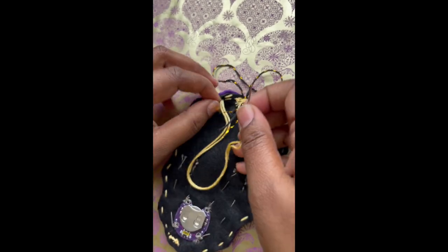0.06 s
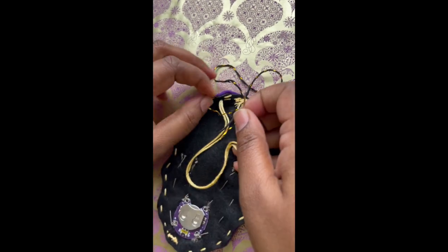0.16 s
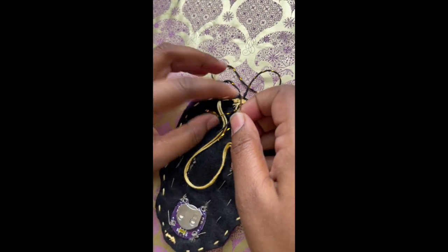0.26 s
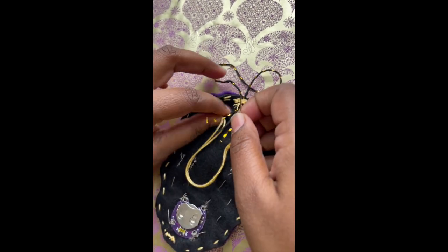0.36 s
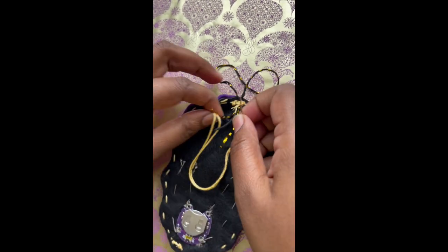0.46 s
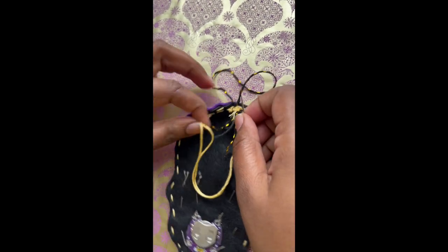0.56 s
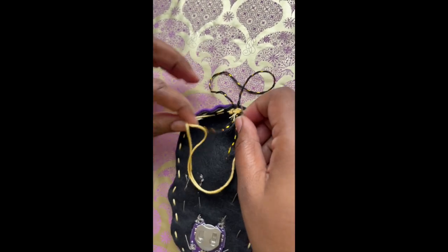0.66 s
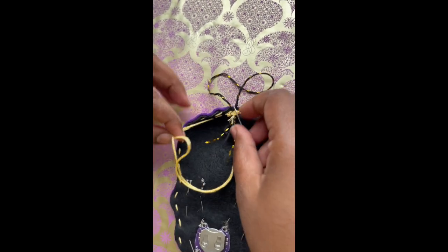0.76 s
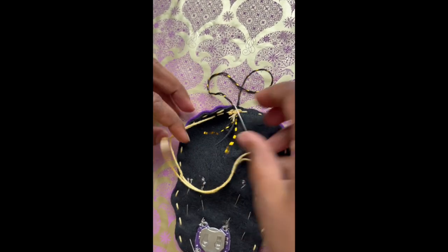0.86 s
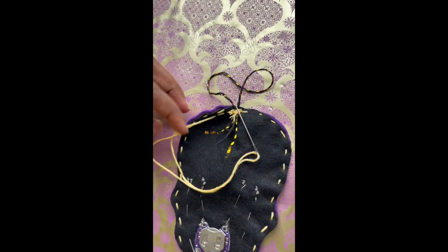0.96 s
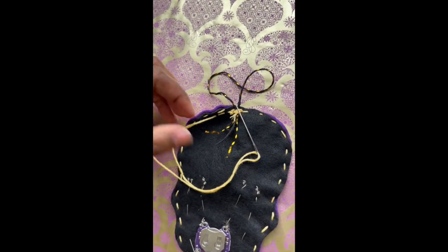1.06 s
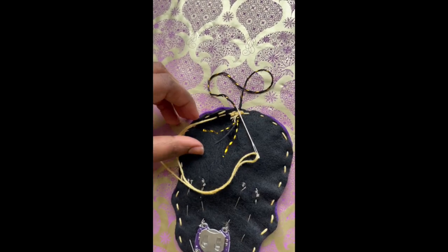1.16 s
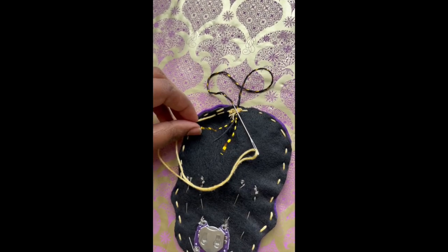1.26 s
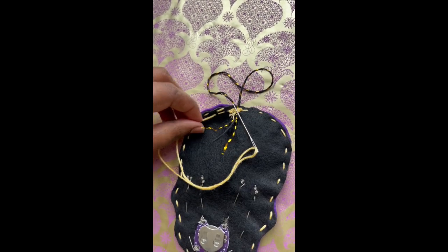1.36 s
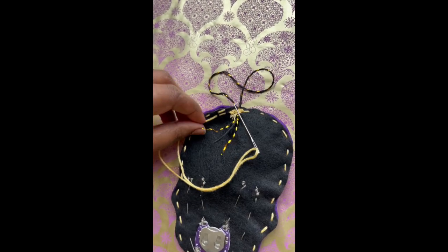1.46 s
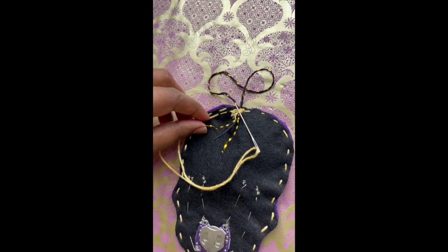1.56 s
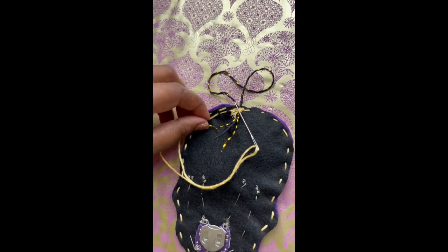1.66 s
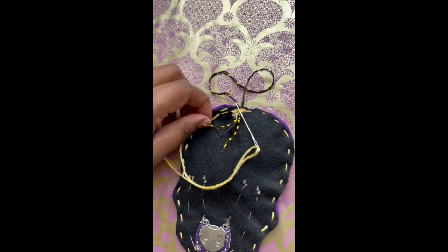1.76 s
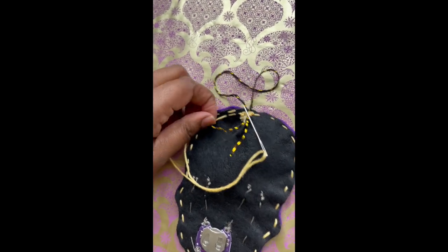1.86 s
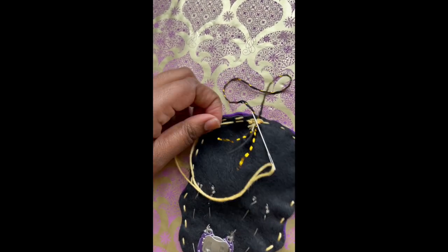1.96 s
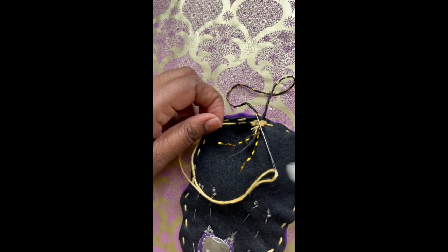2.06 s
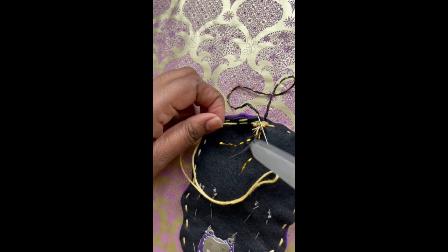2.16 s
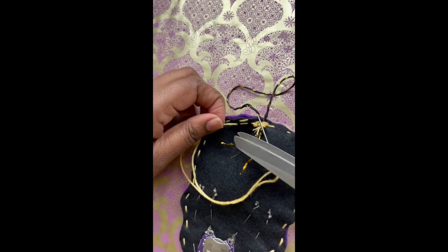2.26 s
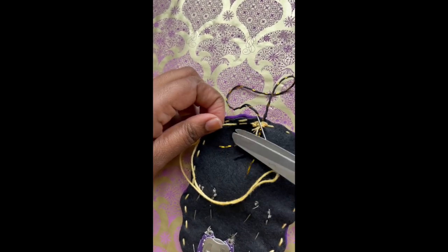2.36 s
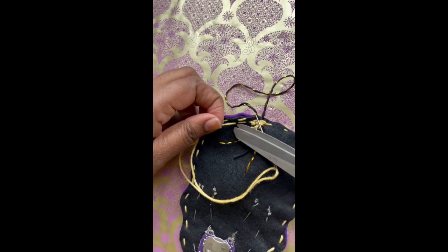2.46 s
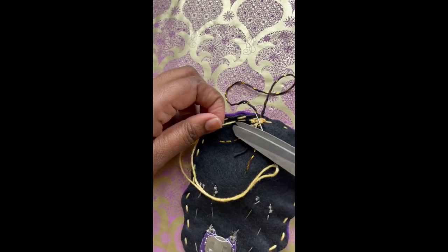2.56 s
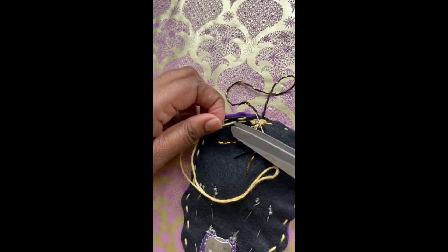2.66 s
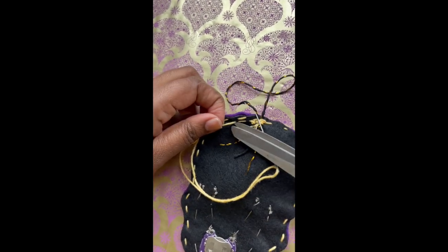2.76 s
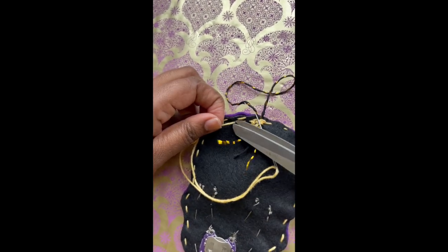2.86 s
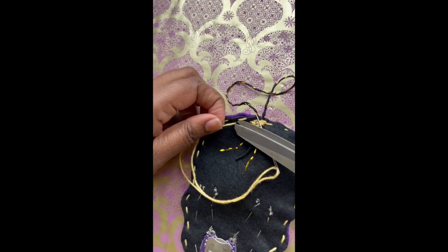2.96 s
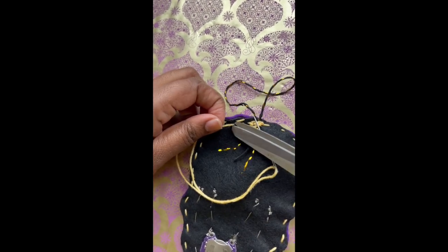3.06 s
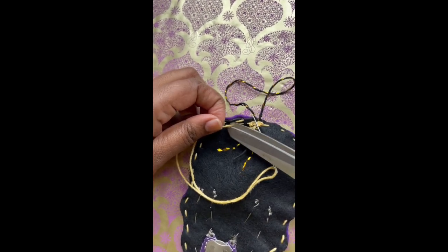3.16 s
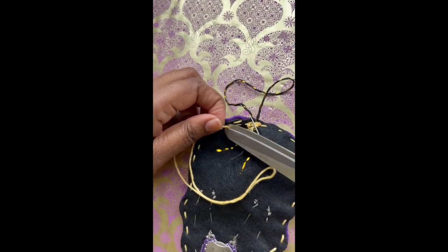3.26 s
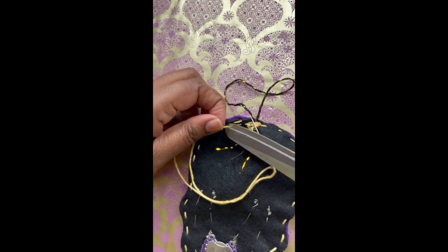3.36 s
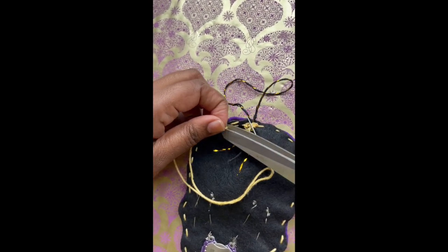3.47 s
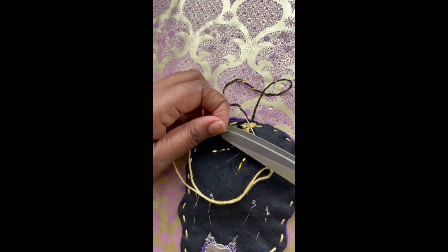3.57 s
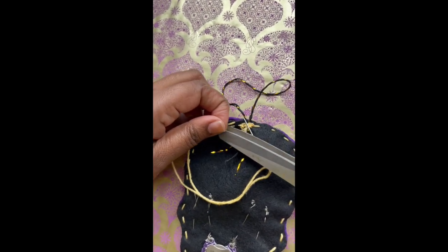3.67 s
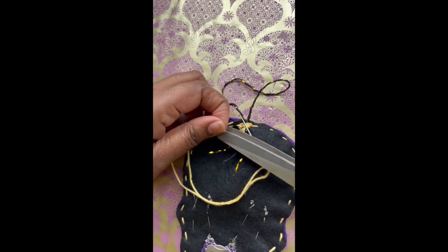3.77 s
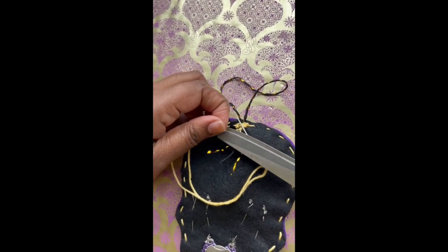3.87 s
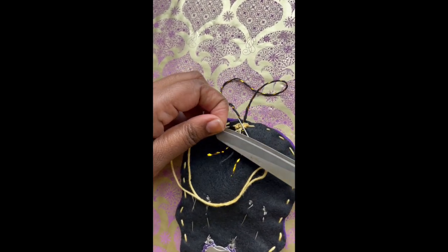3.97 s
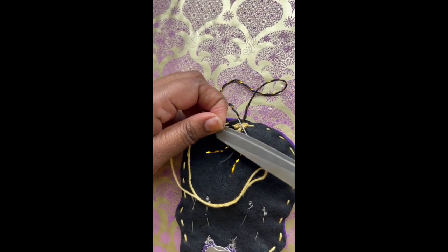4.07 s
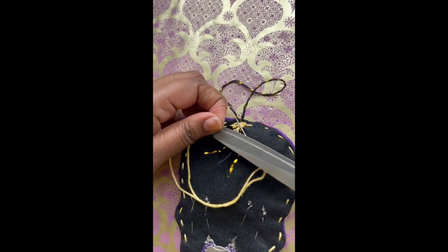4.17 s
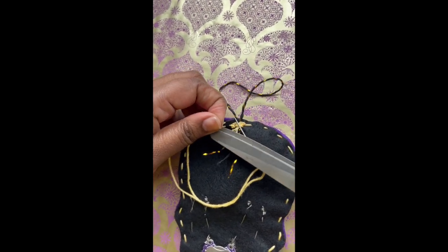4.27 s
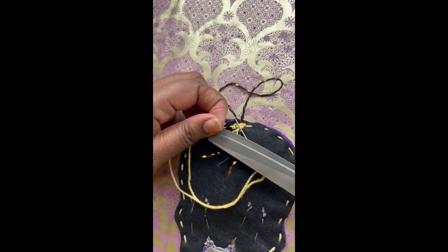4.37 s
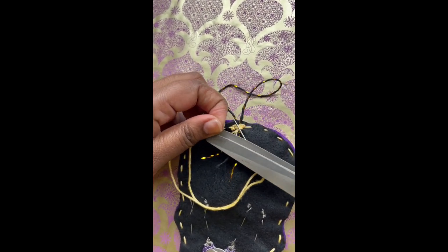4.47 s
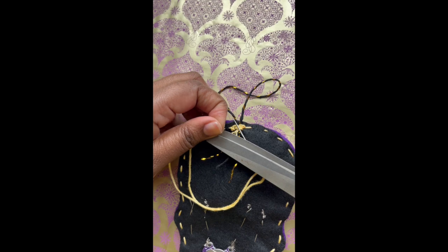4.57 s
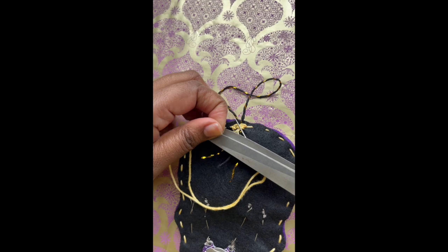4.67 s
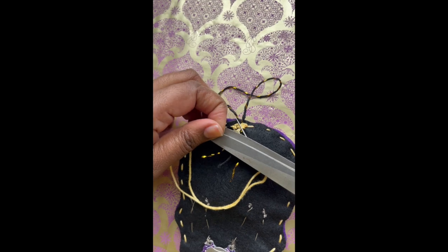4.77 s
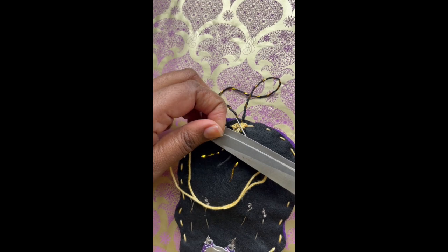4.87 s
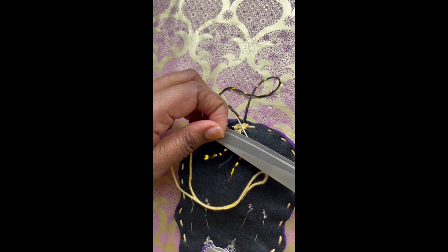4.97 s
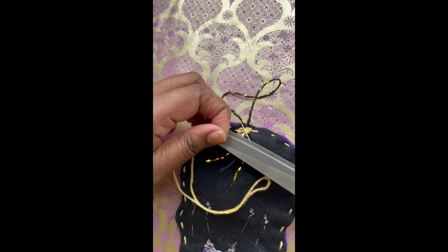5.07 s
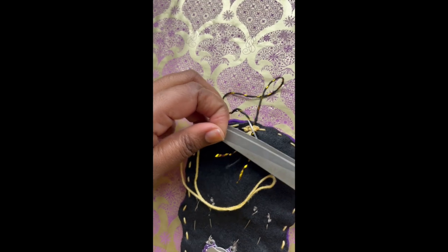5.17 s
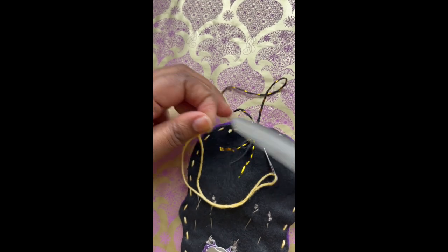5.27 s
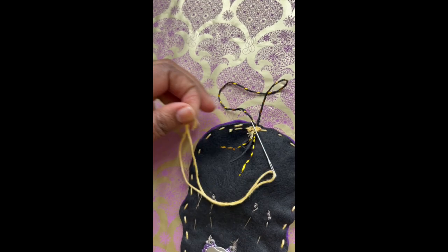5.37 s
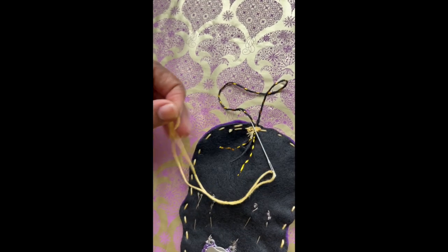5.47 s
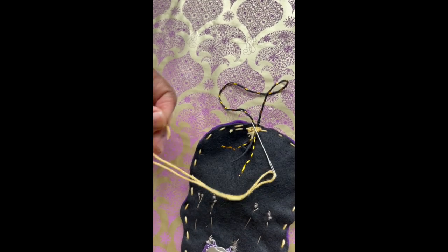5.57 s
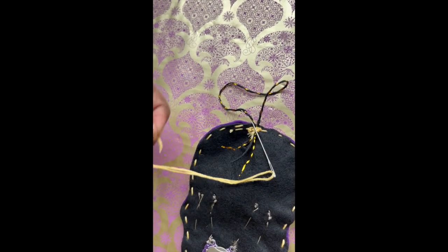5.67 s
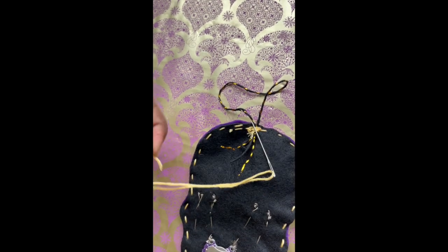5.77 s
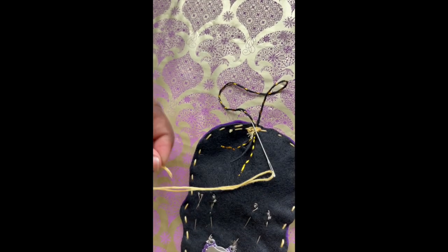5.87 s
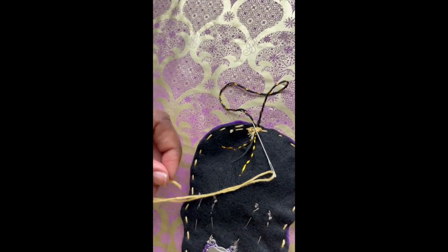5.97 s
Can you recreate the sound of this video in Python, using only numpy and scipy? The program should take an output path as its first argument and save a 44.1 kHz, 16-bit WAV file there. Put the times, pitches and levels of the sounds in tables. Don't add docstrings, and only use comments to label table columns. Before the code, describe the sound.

A close, slightly wide phone pickup in a small room, with soft hiss and a far machine's low, wavering hum. From 0 to 0.8 s fingers rub felt and thread in short dry strokes with small ticks. From 0.8 to 1.7 s handling is busier: sharper snags, a quick thread draw near 1 s, and dull padded table thuds, strongest around 1.26 s. It fades by 2.1 s to faint fingertip shifts and rare ticks. At about 3.75 s blades grind briefly and snap shut at 3.8 s with a bright, short ring. Quiet fidgeting follows; a weaker, duller cut comes around 4.9 s, then slight rustling. At 5.54 s the scissors drop loudly with a metallic crack and low wooden boom, bounce at 5.67 and 5.77 s, rattle briefly and settle, leaving short reverb and hum until about 6 s.

```python
import sys
import numpy as np
from scipy import signal
from scipy.fft import rfft, irfft, next_fast_len
from scipy.io import wavfile
from scipy.ndimage import uniform_filter1d

SR = 44100
rng = np.random.default_rng(int(sys.argv[2]) if len(sys.argv) > 2 else 0)


def decibels_to_gain(level_db):
    exponent = np.asarray(level_db, float) / 20
    return 10 ** exponent


def to_wav(s):
    ch = np.atleast_2d(s).T
    pcm = np.round(np.clip(ch, -1, 1) * 32767)
    wavfile.write(sys.argv[1], SR, pcm.astype(np.int16))


N = 265951


def evened(x):
    return x / np.sqrt(np.mean(x ** 2) + 1e-20)


def shaped(x, points):
    f, db = np.transpose(points)
    size = next_fast_len(x.shape[-1])
    hz = np.fft.rfftfreq(size, 1 / SR)
    above_db = db[-1] - 12 * (f[-1] < 300)
    gain = decibels_to_gain(np.interp(np.log(hz + 1), np.log(f), db, right=above_db))
    return irfft(rfft(x, size) * gain, size)[..., :x.shape[-1]]


def coloured(x, points):
    return evened(shaped(x, points))


def curve(points):
    return np.interp(np.arange(N) / SR, *np.transpose(points))


def add(mix, s, sound):
    part = mix[round(s * SR):][:len(sound)]
    part += sound[:len(part)]


def resonate(x, hz, width):
    turn = np.exp(2j * np.pi * np.cumsum(hz * np.ones(len(x))) / SR)
    r = np.exp(-np.pi * width / SR)
    return 2 * (turn * signal.lfilter([1 - r], [1, -r], x / turn + 1e-18)).real


def strokes(rows, rise, fall, with_last=0.):
    power = np.zeros(N)
    for start, top, end, db, last in rows:
        t = np.arange(0, end - start, 1 / SR)
        swell = (t / (top - start)) ** rise
        release = abs((end - start - t) / (end - top)) ** fall
        shape = np.where(t < top - start, swell, release)
        add(power, start, (decibels_to_gain(db + with_last * last) * shape) ** 2)
    return np.sqrt(power)


def fibres(per_s, spread_db, smooth):
    size = decibels_to_gain(spread_db * np.minimum(rng.exponential(1, N), 3.6))
    slips = size * (rng.random(N) < per_s / SR) * rng.standard_normal(N)
    flutter = evened(uniform_filter1d(rng.standard_normal(N), size=500))
    return (evened(slips) + smooth * rng.standard_normal(N)) * decibels_to_gain(1.85 * flutter)


# time in seconds, hum level in dB.
HUM = [(0, -66.5), (.35, -64), (1.2, -61), (1.47, -58.5), (1.85, -62), (2.1, -64), (2.5, -64.5),
       (3.04, -68.5), (3.48, -66), (3.65, -70), (4.08, -69.5), (4.8, -74), (5.0, -70), (5.13, -81),
       (5.33, -68.5), (5.52, -65), (6.03, -64.5)]
IDLE_DB = -62.5
# frequency in Hz, level in dB.
RUMBLE = [(14, -60.5), (30, -8), (58, 6), (84, -16), (101, 1), (118, -14.5), (152, -6.5), (260, -34)]
DRONE = [(150, -29.5), (210, 2.5), (250, 4), (330, -10.5), (560, -12), (800, -26)]


def machine():
    hum_hz, waver_width_hz = 84.5, 1.5
    hum_db = curve(HUM)
    rumble_db = -70 + 0.36 * (hum_db - IDLE_DB)
    drone_db = -90 + 2.6 * (hum_db - IDLE_DB)
    waver, rumble, drone = rng.standard_normal((3, N))
    hum = 0.32 * evened(resonate(waver, hum_hz, waver_width_hz))
    hum = hum + 1.38 * np.sin(2 * np.pi * hum_hz * np.arange(N) / SR)
    low = decibels_to_gain(rumble_db) * coloured(rumble, RUMBLE) + decibels_to_gain(drone_db) * coloured(drone, DRONE)
    return decibels_to_gain(hum_db + 2.5) * hum + low


# frequency in Hz, level in dB, width in Hz.
MURMUR = [(52.7, -74, 2.7), (102, -76, 2.8), (134, -78, 5.5), (156, -73, 3.8), (215, -85, 3.7),
          (240.2, -85.5, 5.9)]


def table_hum():
    shake = rng.standard_normal((len(MURMUR), N))
    murmur = sum(decibels_to_gain(db) * evened(resonate(v, hz, width)) for (hz, db, width), v in zip(MURMUR, shake))
    return decibels_to_gain(1.2 * (curve(HUM) - IDLE_DB)) * murmur


# frequency in Hz, level in dB.
AIR = [(200, 27.5), (500, 11.5), (1000, 1), (1800, 6), (3000, -2.5), (6000, -4.5), (10000, -43),
       (16000, -55)]
# frequency in Hz, level in dB.
UNLIKE = [(60, -9.5), (250, -8), (700, 7.5), (1200, 6), (1800, -12), (2800, -3), (4800, -1), (6200, -14),
          (10400, -24.5)]


def still_air():
    alike, unlike = decibels_to_gain(-78.5) * coloured(rng.standard_normal((2, N)), AIR)
    return alike + np.array([[1.5], [-1.5]]) * shaped(unlike, UNLIKE)


# frequency in Hz, time to fall 60 dB in seconds.
ROOM = [(100, 0.37), (500, 0.25), (2000, 0.27), (5000, 0.31), (9000, 0.26), (13000, 0.28), (14800, 0.065)]


def room(x):
    taps = np.zeros((2, SR // 2))
    at = np.arange(200, SR // 2 - 20, 20) + rng.integers(0, 20, (2, (SR // 2 - 201) // 20))
    np.put_along_axis(taps, at, rng.choice([-1., 1.], at.shape), 1)
    hz, t, z = signal.stft(taps, SR, nperseg=256)
    t60 = np.interp(hz, *np.transpose(ROOM))[:, None]
    tail = signal.istft(z * decibels_to_gain(-60 * t / t60), SR, nperseg=256)[1]
    tail = tail[0] + np.array([[1], [-1]]) * shaped(tail[1], UNLIKE)
    return signal.fftconvolve(x[None], tail / np.linalg.norm(tail[0]), axes=1)[:, :N]


# frequency in Hz, unlike share in dB.
NEAR_UNLIKE = [(300, -25), (1200, -17.5), (2800, -8), (4800, -12), (6200, -12.5), (10000, -17),
               (13500, -13.5), (15000, -30)]


def scattered(x):
    z = signal.stft(x, nperseg=128)[2]
    phase = 2j * np.pi * rng.random(z.shape[::-1]).T
    turned = signal.istft(z * np.exp(phase), nperseg=128)[1][:N]
    return np.array([[1], [-1]]) * shaped(turned, NEAR_UNLIKE)


# time in seconds, peak in dB, hardness in dB an octave,
# mode favoured by the spot in Hz, ring length factor.
THUDS = [(0.298, -48, 5, 395, 1.4), (0.8, -52.5, 4, 215, 1.8), (0.866, -39, 2, 221, 0.85),
         (0.889, -49.5, 4, 218, 1.4), (1.259, -29, -2, 318, 1.44), (1.47, -36.5, -2.5, 220, 0.94),
         (1.505, -43, -0.5, 243, 0.74), (1.626, -36, 2.5, 235, 0.9), (1.662, -42.5, 5, 272, 0.65),
         (1.705, -48.5, 6.5, 344, 0.48), (1.735, -53.5, -7, 101, 1.1), (2.024, -64, 7, 465, 0.38),
         (3.803, -57.5, 3.5, 231, 0.68), (5.08, -65, 1.5, 228, 2.5), (5.28, -59, -2, 205, 2.2),
         (5.381, -62, 2, 225, 2.5), (5.5396, -20.5, 0.5, 242, 0.73), (5.6663, -23, 2.5, 236, 1.06),
         (5.766, -21, 2, 375, 1.22), (5.813, -38, 3.5, 215, 1)]
SPOTS = [(2, -6, -2, -4), (0, -9, 0, -1), (7, 5, -4, -9), (4, -18, -1, -3), (5, 1, 3.5, -2),
         (-7, 2.5, 1.5, -3), (-2, -3, 1.5, 1), (-1, 6, 5, -8), (-3, -18, -5, 3.5), (-3, -9, 0, -10),
         (-9, -13, -4, -8), (0, -3, -5, 3), (3, 0, -2.5, -2), (-3, 1.5, 0, -1.5), (0.5, -0.5, 1, 0.5),
         (0, 0, 0.5, -1), (1.5, 2.5, -5, 3), (-14, -5, 3, 6), (0, -0.5, 2.5, 1), (-1, 0, -8, -8)]
# frequency in Hz, level in dB, time to fall 60 dB in seconds.
TABLE = [(53, -9.5, 0.37), (70.2, 4.5, 0.3), (97.9, 5, 0.33), (130, 1, 0.31), (164, -8.5, 0.13),
         (180, -14, 0.35), (215, -7.5, 0.18), (242, -9, 0.15), (283, -14, 0.2), (318, -10.5, 0.17),
         (357, -14.5, 0.09), (400, -15, 0.1), (475, -16, 0.095), (589, -14, 0.054)]
BENDING = 0.1094


def thuds():
    out = np.zeros(N)
    hz, mode_db, t60 = np.transpose(TABLE)[:, :, None]
    t = np.maximum(np.arange(SR // 2) / SR - BENDING / np.sqrt(hz), 0)
    sign = -(-1.) ** np.arange(len(TABLE))[:, None]
    nodes = np.pad(SPOTS, [(0, 0), (0, len(TABLE) - len(SPOTS[0]))])[:, :, None]
    swell = 1 - np.exp(-t * hz / 0.3)
    for (s, db, hard_db, spot_hz, ring), node_db in zip(THUDS, nodes):
        fall = 0.55 * decibels_to_gain(-60 * t / (0.38 * ring * t60)) + 0.26 * decibels_to_gain(-60 * t / (ring * t60))
        favour_db = 11.2 * np.exp(-(np.log2(hz / spot_hz) / 0.18) ** 2)
        level = decibels_to_gain(mode_db + hard_db * np.log2(hz / 100) + favour_db + node_db - 9.0)
        modes = sign * level * swell * fall * np.sin(2 * np.pi * hz * t)
        add(out, s, decibels_to_gain(db) * modes.sum(0))
    return out


def crack(centre_hz, tilt_db, size=4096):
    hz = np.fft.rfftfreq(size, 1 / SR) + 1
    above_db = tilt_db * np.log2(np.maximum(hz / centre_hz, 1))
    below_db = 3.8 * np.log2(np.minimum(hz / centre_hz, 1))
    colour_db = above_db + below_db - 14.0 * (hz / 11000) ** 2
    delay = np.exp(-4j * np.pi * 0.699 * BENDING * np.sqrt(hz))
    sweep = irfft(decibels_to_gain(colour_db) * delay, size)[:size // 2]
    return sweep / abs(sweep).max()


# time in seconds, crack in dB, strongest ring in Hz, ring in dB, tilt in dB an octave.
KNOCKS = [
    (3.8075, -25.5, 3610, -2.5, -5.5),
    (4.949, -41, 2480, -7, -31),
    (5.5426, -13.5, 1700, -7, -2),
    (5.651, -28, 1890, -13, -0.5),
    (5.6668, -16, 2310, -15, -2),
    (5.7666, -13, 1044, -23, -1.5),
    (5.7725, -28, 3490, -5, -1.5),
    (5.7801, -28.5, 5360, -3.5, -3),
    (5.792, -30, 1000, -1.5, -16),
]
CLINKS = [
    (5.539, -37.5, 8460, -10.5, -0.94),
    (5.5523, -28.5, 7660, -7, -1.6),
    (5.556, -32.5, 7100, -7, -1.6),
    (5.7794, -39, 7500, -11, -1),
]
# frequency in Hz, level in dB, time to fall 60 dB in seconds.
STEEL = [(1030, -16, 0.0051), (1310, -15.5, 0.014), (1510, 6.5, 0.011), (1800, -1, 0.0082), (2219, 0, 0.05),
         (2480, 5, 0.027), (2610, 7, 0.012), (3255, 0, 0.025), (4000, -3, 0.0087), (4510, -2.5, 0.011),
         (4670, 2, 0.016), (5700, 5.5, 0.032), (8300, -15, 0.0069)]


def knocks():
    steel, cracks, t = np.zeros(N), np.zeros(N), np.arange(4000) / SR
    hz, mode_db, t60 = np.transpose(STEEL)[:, :, None]
    blows = [(*row, -5.5) for row in KNOCKS] + [(*row, 5) for row in CLINKS]
    chances = rng.standard_normal((len(blows), len(t)))
    for (s, db, centre_hz, ring_db, tilt_db, rattle_db), chance in zip(blows, chances):
        reach_db = ring_db - 11.0 * np.log2(hz / centre_hz) ** 2
        detune = 1 + 0.019 * chance[:len(STEEL), None]
        modes = decibels_to_gain(mode_db + reach_db - 60 * t / t60) * np.sin(2 * np.pi * hz * detune * t)
        damping = (1.3 * decibels_to_gain(-60 * t / 0.027) + 0.5) * np.minimum(t / 0.0014, 1)
        colour = [(centre_hz / 29.0, -14), (centre_hz, 0), (33.0 * centre_hz, 25.0 * tilt_db)]
        rattle = decibels_to_gain(rattle_db - 60 * t / 0.014) * coloured(chance, colour)
        rattle = rattle * np.minimum(t / 0.0026, 1)
        add(steel, s, decibels_to_gain(db - 3.5) * modes.sum(0) * damping)
        add(cracks, s, decibels_to_gain(db - 3.5) * rattle)
        add(cracks, s - .0007, decibels_to_gain(db - 8.5) * crack(centre_hz, tilt_db))
    return steel, cracks


# time in seconds, then modes of frequency in Hz, peak in dB, 60 dB fall in seconds.
RINGS = [
    (3.8068, [(769, -52.5, 0.077), (2390, -31.5, 0.039), (2930, -42, 0.058), (3300, -36, 0.064), (4270, -39.5, 0.048), (4790, -31.5, 0.057), (6770, -36, 0.034), (8380, -42, 0.038), (12020, -36.5, 0.037), (13600, -38.5, 0.039)]),
    (5.5428, [(600, -37, 0.14), (1130, -35, 0.19), (1558, -26.5, 0.092), (1684, -14, 0.017), (1986, -20, 0.04), (2066, -25.5, .08), (2310, -38.5, 0.052), (3340, -39, 0.05), (4510, -39.5, 0.043), (5350, -37.5, 0.039)]),
    (5.5528, [(4900, -36, 0.042), (5353, -22, 0.032), (6560, -34, 0.059), (7770, -34, 0.036), (8300, -38, 0.04)]),
    (5.6668, [(516, -29.5, 0.051), (847, -37, 0.083), (1407, -32.5, 0.043), (2210, -32, 0.045), (2840, -42, .05), (3384, -37, 0.043), (4290, -27.5, 0.036), (5180, -28, 0.019), (7150, -36, 0.034)]),
    (5.7668, [(357.5, -30, .14), (480, -38, 0.21), (788, -35, 0.09), (1000, -30, 0.098), (1630, -27, 0.042), (2270, -31, 0.048), (3310, -27.5, 0.056), (4670, -29, 0.026), (5300, -34, .03)]),
]


def rings():
    out, t = np.zeros(N), np.arange(8000) / SR
    for s, modes in RINGS:
        hz, db, t60 = np.transpose(modes)[:, :, None]
        level = decibels_to_gain(db - 0.5 - 60 * t / (0.28 * t60)) + decibels_to_gain(db - 13 - 60 * t / t60)
        sound = (level * np.sin(2 * np.pi * hz * t)).sum(0)
        add(out, s, sound * np.minimum(t / 0.0008, 1))
    return out


# start, hardest moment and end in seconds, level in dB, low grind in dB.
SHEARS = [
    (3.715, 3.762, 3.8, -61, -12),
    (3.75, 3.78, 3.84, -50, -18),
    (3.765, 3.805, 3.828, -44.5, -14),
    (3.81, 3.825, 3.957, -68, 6.5),
    (4.86, 4.882, 4.9, -61, -7),
    (4.925, 4.936, 4.99, -52.5, -5),
    (5.525, 5.541, 5.546, -56, 6),
    (5.75, 5.765, 5.77, -50, -4),
]
# frequency in Hz, width in Hz, level in dB.
BLADE = [(5450, 530, 4), (7140, 720, 1.5), (8300, 760, 1), (10870, 850, 5.5), (12500, 480, -4.5),
         (13600, 390, 3), (15530, 340, 10)]
# frequency in Hz, level in dB.
SCRAPE = [(1500, -16.5), (2800, 9.5), (4000, 3), (5300, 2), (7000, -3.5)]


def shearing():
    slips = fibres(9000, 0.52, 0.97)
    ringing = sum((-1) ** k * decibels_to_gain(db) * resonate(slips, hz, width) for k, (hz, width, db) in enumerate(BLADE))
    level, grind = (strokes(SHEARS, 3, 1.75, share) for share in (0, 1))
    return level * evened(ringing) + grind * coloured(slips, SCRAPE)


# time in seconds, peak in dB, ring in Hz, treble in dB.
TICKS = [(0.091, -55, 3370, -22), (0.148, -45.5, 1930, -11), (0.212, -45, 3540, -20),
         (0.269, -50.5, 2100, -3.5), (0.295, -45, 2060, -12), (0.346, -50.5, 3270, -11),
         (0.39, -58, 2090, 0), (0.636, -54, 2130, -2.5), (0.8, -31, 2120, -19), (0.844, -35.5, 1940, -22),
         (0.86, -45, 1610, -21.5), (0.887, -42.5, 2480, -6), (0.931, -48.5, 1173, -27),
         (0.985, -44.5, 3590, -3.5), (1.068, -60, 1900, -21), (1.094, -45, 1560, -6),
         (1.112, -39.5, 3420, -14), (1.167, -35.5, 1800, -27.5), (1.207, -44.5, 1660, -18),
         (1.238, -43, 4000, -20), (1.265, -47, 5060, -20), (1.306, -44, 1800, -10), (1.432, -52, 1910, -8),
         (1.468, -49, 990, 2), (1.479, -40.5, 1770, -18), (1.527, -56, 1910, -13.5),
         (1.553, -48, 1750, -22), (1.61, -49, 2040, -8.5), (1.624, -37.5, 2770, -14),
         (1.655, -36.5, 5200, -8.5), (1.662, -45, 890, -10), (1.698, -42, 2160, -7),
         (1.926, -57.5, 1680, -12), (1.99, -51, 1740, -15), (2.235, -56.5, 1710, -13),
         (2.339, -54, 1868, -5), (2.597, -59, 1760, 14), (2.983, -55.5, 1800, -3), (3.008, -76, 1820, -8),
         (4.75, -72, 1670, -11), (4.919, -62, 1780, -8), (5.274, -66.5, 2500, 12),
         (5.223, -55.5, 2400, 8.5), (5.32, -55, 1350, 3.5), (4.9355, -53, 4430, 4), (4.943, -55, 1700, 3),
         (4.874, -61, 3020, 13), (2.489, -60.5, 1800, 17.5), (2.75, -67, 1800, 11.5),
         (3.832, -50.5, 4660, -9)]


def ticks():
    out, t = np.zeros(N), np.arange(2000) / SR
    spits = rng.standard_normal((len(TICKS), len(t)))
    for (s, db, hz, treble_db), spit in zip(TICKS, spits):
        ring = np.sin(2 * np.pi * hz * t) + 0.5 * np.sin(2 * np.pi * 1.49 * hz * t)
        ring = ring + 0.22 * np.sin(2 * np.pi * 0.425 * hz * t) + .12 * spit
        bright = decibels_to_gain(treble_db) * np.diff(spit, prepend=0) * decibels_to_gain(-60 * t / 0.0037)
        add(out, s, decibels_to_gain(db - 60 * t / .011) * (ring + bright) * np.minimum(t / 0.00036, 1))
    return out


# start, hardest moment and end in seconds, level in dB, whistle in Hz.
THREAD = [
    (0.981, 0.982, 1.09, -54.5, 3300),
    (1.051, 1.068, 1.04, -62, 3200),
    (1.105, 1.113, 1.45, -61, 3620),
    (1.7, 1.76, 2.13, -74.5, 520),
]


def drawn_thread(slips):
    hz = curve([point for row in THREAD for point in [(row[0], row[4]), (row[1] + .05, row[4])]])
    whistle = evened(resonate(resonate(slips, hz, 670), hz, 1200))
    return strokes(THREAD, 0.97, 5.6) * whistle


def patchy(x):
    z = signal.stft(x, nperseg=256)[2]
    patches = uniform_filter1d(rng.standard_normal(z.shape[::-1]), size=14, axis=0)
    patches = uniform_filter1d(patches, size=3, axis=1)
    return evened(signal.istft(z * decibels_to_gain(2.5 * evened(patches).T), nperseg=256)[1][:N])


# start, hardest moment and end in seconds,
# level in dB, fibre hiss in dB.
PULLS = [(0, .035, 0.28, -62.5, -9), (.07, .2, 0.24, -60, -10), (.258, .272, 0.43, -62.5, -12),
         (.3, .41, 0.36, -62, -7), (.36, .53, 0.61, -59, -3.5), (.61, .65, 0.84, -62.5, -6.5),
         (.79, .82, 0.85, -58.5, -7.5), (.85, .883, 0.88, -58.5, -2), (.9, .93, 1.07, -81.5, -3),
         (1.075, 1.095, 1.179, -56, -14), (1.19, 1.23, 1.304, -53.5, -11), (1.29, 1.37, 1.385, -55.5, -19),
         (1.415, 1.44, 1.505, -55, -9), (1.49, 1.56, 1.583, -58.5, -8), (1.58, 1.63, 1.72, -56, -1),
         (1.71, 1.76, 1.837, -61.5, -6.5), (1.78, 1.92, 2.037, -65, -2), (1.97, 2.07, 2.13, -71.5, -10.5)]
FIDGETS = [(2.144, 2.174, 2.18, -73.5, -2), (2.219, 2.234, 2.34, -75, -4), (2.3, 2.3, 2.34, -72, -4),
           (2.402, 2.462, 2.584, -70.5, -7.5), (2.579, 2.636, 2.713, -70.5, 0),
           (2.722, 2.73, 2.78, -82, -5), (2.806, 2.92, 3.1, -76, -3.5), (3.002, 3, 3.11, -67, -10),
           (3.098, 3.1, 3.38, -77.5, -9), (3.153, 3.204, 3.236, -67, -8.5), (3.341, 3.47, 3.524, -71, -4),
           (3.526, 3.59, 4.1, -82.5, -1.5), (3.608, 3.646, 3.79, -81.5, -10.5),
           (3.746, 3.77, 3.795, -70, -29), (3.853, 3.885, 4.05, -74, -25),
           (4.017, 4.076, 4.14, -69.5, -11.5), (4.109, 4.123, 4.28, -89.5, 3),
           (4.244, 4.304, 4.33, -74.5, 0.5), (4.305, 4.361, 4.48, -75.5, -2.5), (4.5, 4.542, 4.58, -85, -2),
           (4.575, 4.63, 4.763, -76.5, -2), (4.73, 4.754, 4.82, -82.5, -9), (4.956, 4.985, 5.08, -69, 2),
           (5.069, 5.153, 5.21, -67.5, -4.5), (5.206, 5.246, 5.5, -80, 0.5), (5.31, 5.322, 5.34, -66, -6.5)]
# time in seconds, resonance in Hz.
HOLLOW = [(0, 1770), (.55, 2156), (.9, 2000), (1.1, 1790), (1.7, 1900), (2.1, 1760), (3.4, 1830),
          (4.6, 1700), (5.15, 1767), (5.4, 1450)]
# frequency in Hz, level in dB.
HISS = [(3500, -68), (5500, 5), (7500, 3), (9200, 7.5), (11000, 0), (13500, -13), (14800, -22),
        (16300, -61)]
BODY = [(250, 11.5), (500, -24), (900, 3.5), (1300, 7), (1800, -32.5)]


def rubbing():
    rise, fall = 0.75, 0.94
    width_hz = 402
    slips, hollow_hz = fibres(5000, 1.5, 0.85), curve(HOLLOW)
    hollow = evened(resonate(resonate(slips, hollow_hz, width_hz), hollow_hz, 3.4 * width_hz))
    level, hiss = (strokes(PULLS + FIDGETS, rise, fall, share) for share in (0, 1))
    scrape = decibels_to_gain(4.5) * strokes(PULLS, rise, fall, 0.42) + decibels_to_gain(-1) * strokes(FIDGETS, rise, fall, 0.42)
    presses = [(PULLS[:10], -2.5), (PULLS[10:15], 4.5), (PULLS[15:], -8)]
    palm = sum(decibels_to_gain(-8 + db) * strokes(rows, rise, fall, 0.27) for rows, db in presses)
    cloth = level * hollow + hiss * coloured(slips, HISS) + scrape * patchy(coloured(slips, SCRAPE))
    return cloth + palm * coloured(slips, BODY) + drawn_thread(slips)


def scene():
    hands, shear, (steel, cracks), table = rubbing() + ticks(), shearing(), knocks(), thuds()
    steel = steel + rings()
    metal = shear + steel + cracks
    near = hands + metal + scattered(decibels_to_gain(-3) * hands + decibels_to_gain(5.5) * metal)
    sent = decibels_to_gain(-12) * (hands + shear) + decibels_to_gain(-24) * steel + decibels_to_gain(-7.5) * cracks + decibels_to_gain(-8.5) * table
    early = np.arange(N) < 5.64 * SR
    reverb = room(sent * early) + room(sent * ~early)
    return near + table + reverb + machine() + table_hum() + still_air()


def roll_off(x):
    return signal.sosfilt(signal.butter(12, 16450, fs=SR, output="sos"), x)


# frequency in Hz, left lead in radians, left over right in dB.
PORTS = [(0, 0, -.8), (950, -.9, -1.5), (1700, 0, -.6), (2700, 2.4, -4), (3400, 2.1, 0), (4800, 1.2, -4),
         (5900, 3.14, 0), (8050, 6.28, 0), (9850, 9.0, 0), (10750, 9.9, 0), (12200, 12.4, 0),
         (13400, 13.4, 0), (14700, 15.7, 0), (16000, 18, 0)]
# frequency in Hz, level in dB.
TOP = [(13600, 0), (14600, -9), (16000, -18)]


def record(dry):
    size = next_fast_len(N + 4096)
    f, lead, balance_db = np.transpose(PORTS)
    hz, side = np.fft.rfftfreq(size, 1 / SR), np.array([[.5], [-.5]])
    port = np.exp(1j * side * np.interp(hz, f, lead)) * decibels_to_gain(side * np.interp(hz, f, balance_db))
    capsule = decibels_to_gain(np.interp(hz, *np.transpose(TOP))) * (hz < 16450)
    mix = irfft(rfft(dry, size) * port * capsule, size)[:, :N]
    return roll_off(mix)


dry = scene()
out = record(dry)
to_wav(out)
```